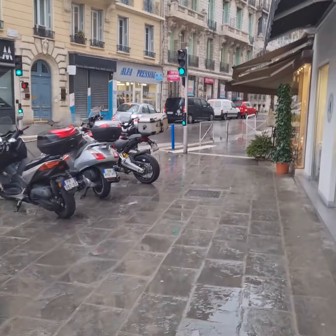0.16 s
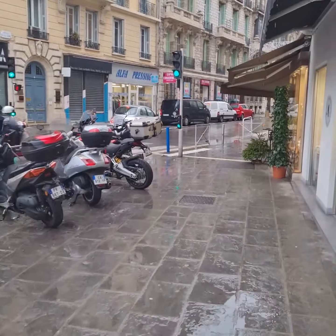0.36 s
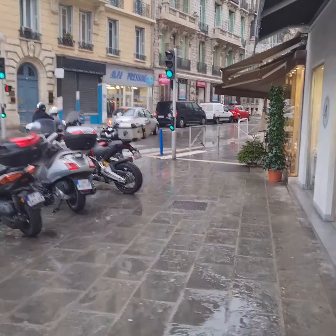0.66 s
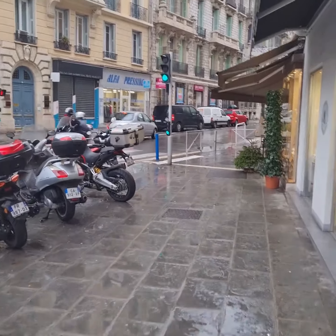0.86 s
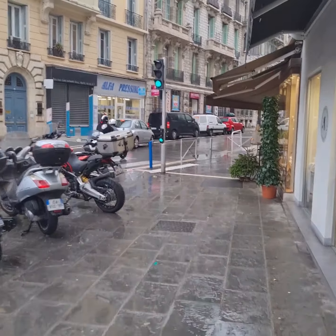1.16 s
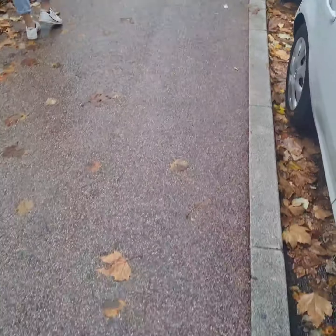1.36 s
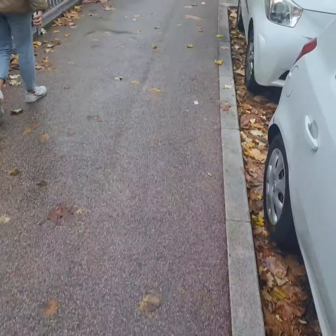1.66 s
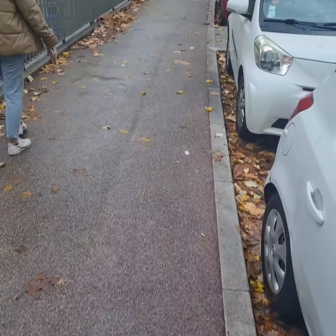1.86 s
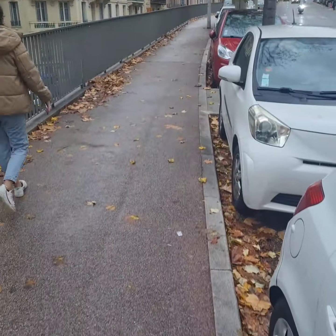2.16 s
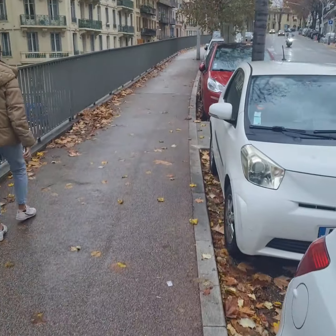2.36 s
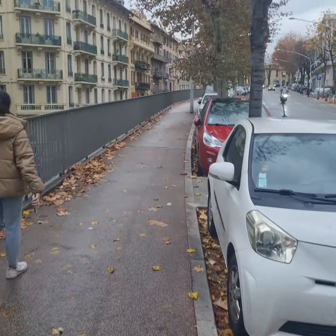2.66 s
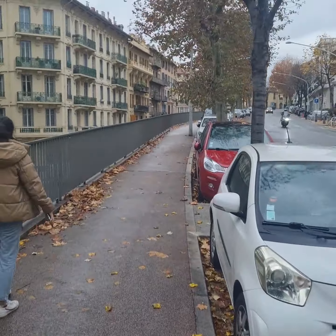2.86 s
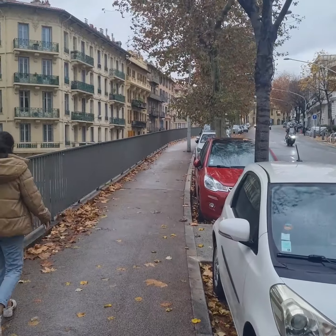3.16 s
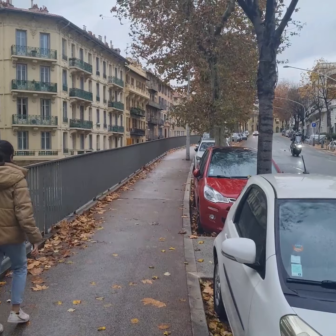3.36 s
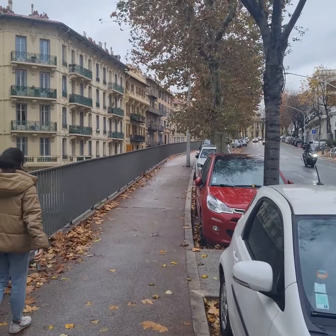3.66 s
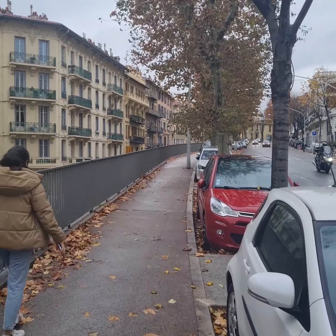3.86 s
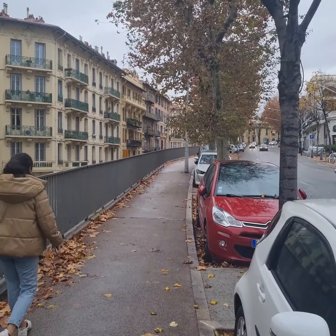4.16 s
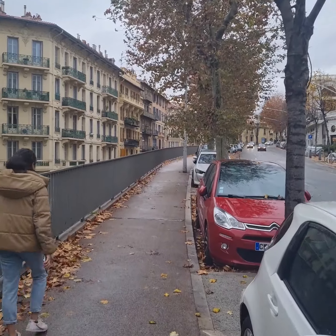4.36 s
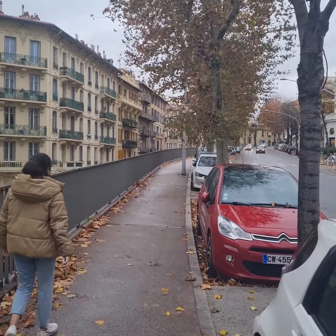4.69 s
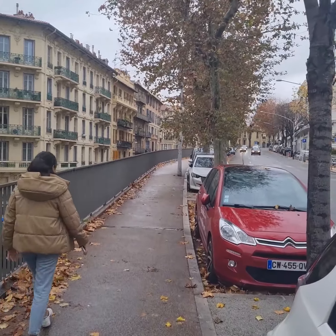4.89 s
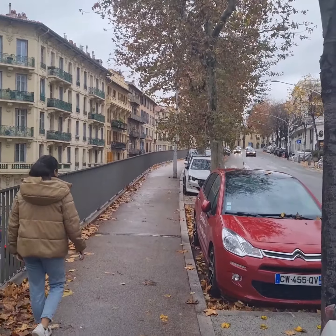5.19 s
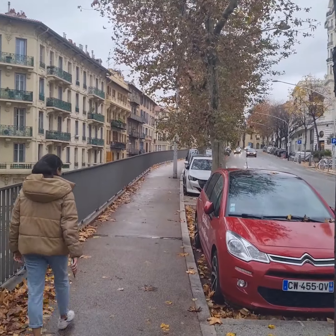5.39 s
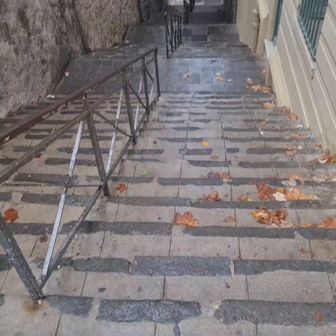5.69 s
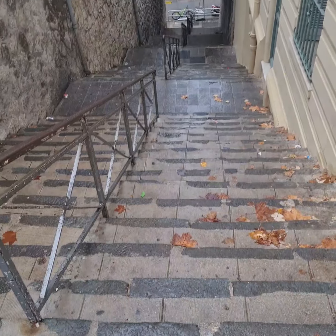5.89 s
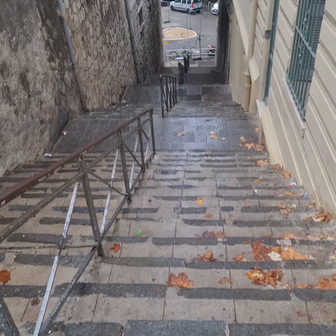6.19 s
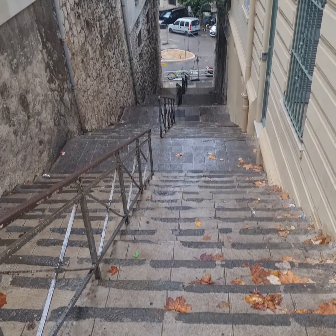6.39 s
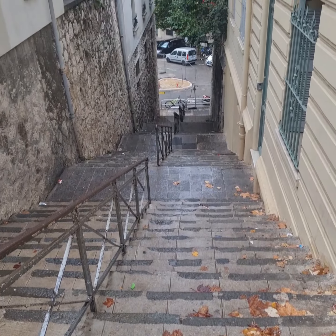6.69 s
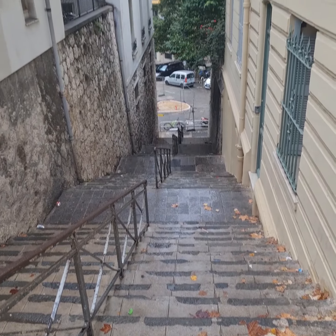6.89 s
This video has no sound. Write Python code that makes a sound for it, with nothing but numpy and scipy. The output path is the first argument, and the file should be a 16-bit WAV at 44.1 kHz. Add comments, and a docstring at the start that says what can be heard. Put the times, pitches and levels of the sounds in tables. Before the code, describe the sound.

Wet city traffic rumbles and hisses, with fine water spatter throughout, in three outdoor stretches that start and stop abruptly. Until 1.4 seconds a motorbike drones and rattles past, easing off, with a faint, very thin brake squeal around 1 second. After a brief silence, a quieter street begins at 1.5 seconds. Shoes tick and scuff irregularly on wet grit until about 3.4 seconds, and once more near 4.8. From 2.8 to 4.2 seconds a high brake squeal climbs slightly, is strongest around 3.6, then sinks away. Engines hum as a car draws near, its tyre hiss and low boom growing until a sudden stop at 5.7 seconds. After another tiny gap, duller traffic drones between walls, with one engine swelling around 6.5 seconds and continuing to the end at about 7.

```python
"""A walk through a wet town

Three short scenes with brief silences between them. At a junction a motorbike's exhaust drones and
rattles over the traffic. Along an avenue shoes tick on grit, a wet brake disc squeals and a car draws
near on hissing tyres. From a stairway between walls the traffic drones. Water spatters throughout."""
import sys
import numpy as np
from scipy import signal
from scipy.fft import rfft, irfft, next_fast_len
from scipy.io import wavfile
from scipy.ndimage import uniform_filter1d, map_coordinates

SR = 44100
rng = np.random.default_rng(int(sys.argv[2]) if len(sys.argv) > 2 else 0)


def to_wav(sig):
    """Store sig (one row per channel, or 1-D mono) as 16-bit WAV at the path in sys.argv[1].

    Samples outside -1..1 are clipped; the rate is SR.
    """
    pcm = np.clip(np.atleast_2d(sig), -1, 1) * 32767
    pcm = np.round(pcm).astype(np.int16)
    wavfile.write(sys.argv[1], SR, pcm.T)  # frames by channels


N = 310464

# when each place is heard: (start [s], end [s])
JUNCTION_SPAN, AVENUE_SPAN, STAIRS_SPAN = (-.01, 1.401), (1.4955, 5.7105), (5.784, 7.1)
TOP_HZ = 15870


def amp(db):
    """Decibels to gain."""
    return 10 ** (np.asarray(db) / 20)


def unit(x):
    """Scale to rms 1."""
    return x / np.sqrt(np.mean(x ** 2) + 1e-20)


def along(points, hz):
    """Read (frequency, value) points on a log frequency axis."""
    knots_hz, values = np.transpose(points)
    return np.interp(np.log(hz + 1), np.log(knots_hz + 1), values)


def curves(rows):
    """One automation curve for each column after the time."""
    times, *columns = np.transpose(rows)
    return [np.interp(np.arange(N) / SR, times, column) for column in columns]


def during(start, end):
    """A gate open between two times; it shuts abruptly, with a faint short tail."""
    t = np.arange(N) / SR
    gate = np.clip(np.minimum(t - start, end - t) / .002, 0, 1)
    tail = .12 * np.clip(1 - np.abs(t - end) / .023, 0, 1)
    return np.maximum(gate, tail)


def wobble(rate):
    """A smooth random curve, rate knots a second."""
    knots = rng.standard_normal(int(N * rate / SR) + 4)
    return map_coordinates(knots, [np.arange(N) * rate / SR], mode="nearest")


def filtered(x, response):
    """Shape x with a frequency response."""
    size = next_fast_len(N + SR // 4)
    return irfft(rfft(x, size) * response(np.fft.rfftfreq(size, 1 / SR)), size)[..., :N]


def passing(nearest_s, passing_s):
    """Least distance over present distance of something that goes by in a straight line."""
    return 1 / np.hypot(1, (np.arange(N) / SR - nearest_s) / passing_s)


def swell(peak_s, half_s, db):
    """A gain that peaks at db and is halved half_s to either side."""
    return amp(db) * passing(peak_s, half_s) ** 2


def flow(bed, cars, swells, scuffs=()):
    """Gains of rumble, roar, hiss and spray: the distant bed, swells, scuffs and cars going by."""
    falloff = np.array([1, 1.5, 1.56])[:, None]  # roar, hiss and spray fall as distance to these powers
    power = np.outer(amp(bed) ** 2, np.ones(N))
    power[0] += sum(swell(*row) ** 2 for row in swells)
    power[-1] += sum(swell(*row) ** 2 for row in scuffs)
    for nearest_s, passing_s, *levels in cars:
        power[1:] += (amp(levels)[:, None] * passing(nearest_s, passing_s) ** falloff) ** 2
    return np.sqrt(power)


def patchy_noise(patchy_db):
    """Two unrelated noises, mottled by patches of gain in time and frequency."""
    spectra = signal.stft(rng.standard_normal((2, N)), nperseg=512)[2]
    patches = uniform_filter1d(rng.standard_normal(spectra.shape[1:]), size=5, axis=0)
    patches = uniform_filter1d(patches, size=12, axis=1)
    return signal.istft(spectra * amp(patchy_db * unit(patches)), nperseg=512)[1][:, :N]


def droplets(rate, spread_db):
    """Water spatters in tiny impacts of very uneven size."""
    hits = (rng.random((2, N)) < rate / SR) * rng.standard_normal((2, N))
    sizes = amp(spread_db * np.minimum(rng.exponential(size=(2, N)), 4))
    return unit(hits * sizes)


def traffic(gains, colour, coherence, waver_db, patchy_db, drops_db):
    """Rumble, tread roar, wet hiss and spray of many cars; droplets pepper the two upper bands."""
    size = next_fast_len(N + SR // 4)
    hz = np.fft.rfftfreq(size, 1 / SR)
    width = np.arccos(np.clip(along(coherence, hz), -1, 1)) / 2
    low_cut = hz ** 2 / (hz ** 2 + 20 ** 2)
    shape = amp(along(colour, hz)) * np.array([np.cos(width), np.sin(width)]) * low_cut
    below = [1 / (1 + (hz / edge_hz) ** 10) for edge_hz in (1, 180, 2800, 8000, 30000)]
    out = np.zeros((2, N))
    for k, (gain, depth_db) in enumerate(zip(gains, waver_db)):
        source = patchy_noise(patchy_db)
        if k >= 2:
            source += amp(drops_db) * droplets(rate=450, spread_db=5.0)
        band = np.sqrt(np.abs(below[k + 1] - below[k]))
        mid, side = rfft(source, size) * shape * band
        pair = irfft(np.array([mid + side, mid - side]), size)[:, :N]
        out += pair / np.std(pair.mean(axis=0)) * gain * amp(depth_db * wobble(9))
    return out


def motorbike(fade_db, rough, clatter_db, wet):
    """A bike rolls past, easing off: exhaust orders on one unsteady shaft, and a pulsing rattle."""
    # the two strongest exhaust orders: (time [s], second order [dB], fourth order [dB])
    main_orders = [(0.0, -21, -41), (0.1, -26.5, -30), (0.716, -34, -25), (0.788, -28.5, -33.5),
                   (0.948, -38, -32), (1.01, -43, -41), (1.086, -27, -32), (1.184, -37, -33),
                   (1.39, -46, -38.5)]
    # single orders ring out: (order, time [s], half length [s], level [dB])
    order_swells = [(6, 0.64, 0.063, -35.5), (8, .84, 0.16, -36.5), (5, 1.22, .08, -35)]
    # exhaust overtones: (order, relative level [dB])
    exhaust = [(3, 0.5), (5, -6), (6, -3.5), (7, 0.5), (8, -6), (9, -3.5), (10, -8), (11, -9.5), (12, -8),
               (13, -9.5), (14, -5.5), (15, -25), (16, -10)]
    t = np.arange(N) / SR
    second_db, fourth_db = curves(main_orders)
    near = amp(-39.5) * passing(nearest_s=0.21, passing_s=0.9)
    shaft_hz = (67.28 - 0.806 * t) * (1 + .005 * wobble(25))
    phase = 2 * np.pi * np.cumsum(shaft_hz) / SR
    tone = lambda order: np.sqrt(2) * np.sin(order * phase + rng.uniform(0, 2 * np.pi))
    boom_db = -43.5 + 9.5 * np.minimum(t, JUNCTION_SPAN[1])  # the lowest boom grows behind the bike
    boom = amp(boom_db) * tone(1) + amp(second_db) * tone(2)
    drone = amp(fourth_db) * tone(4) + sum(swell(*row) * tone(k) for k, *row in order_swells)
    # wall reflections make each overtone swell and fade on its own
    overtones = near * sum(amp(db + fade_db * wobble(7.3)) * tone(k) for k, db in exhaust)
    firing = 1 + rough * wobble(60)  # no two firings are equally strong
    rattle = filtered(rng.standard_normal((2, N)), lambda hz: 1 / (1 + ((hz - 2100) / 700) ** 2))
    rattle = unit(rattle * (1 + np.cos(phase))) * near * amp(clatter_db)
    return boom + firing * drone + street_echo(firing * overtones, wet) + rattle


def street_echo(x, wet):
    """House fronts scatter a sound differently to each ear."""
    # decay between the house fronts: (frequency [Hz], t60 [s])
    facades = [(100, 0.99), (2000, 0.38), (6000, 0.6), (14000, .25)]
    hz, t, spectra = signal.stft(rng.standard_normal((2, SR * 3 // 4)), SR, nperseg=256)
    decay = amp(-60 * t / along(facades, hz)[:, None])
    tail = signal.istft(spectra * decay, SR, nperseg=256)[1]
    echo = signal.fftconvolve(x[None], tail, axes=1)[:, :N]
    return np.sqrt(1 - wet) * x + np.sqrt(wet) * unit(echo) * np.std(x)


def brake(hz, gain, jitter, chatter_db, octave_db, wet):
    """A wet disc sings in one mode; the pad grips and slips, shaking its pitch and strength."""
    phase = 2 * np.pi * np.cumsum(hz * (1 + jitter * wobble(420) + 0.0041 * wobble(40))) / SR
    octave = amp(octave_db) * np.sin(2 * phase) * (2 * hz < TOP_HZ)
    chatter = amp(chatter_db * np.tanh(wobble(110)))
    squeal = unit((np.sin(phase) + octave) * chatter)
    return street_echo(squeal * gain, wet)


def junction():
    """A motorbike and one thin brake squeal over the traffic."""
    # distant traffic: (rumble [dB], roar [dB], hiss [dB], spray [dB])
    bed = (-38.5, -35.5, -45, -53)
    # pass-bys: (nearest at [s], passing time [s], roar [dB], hiss [dB], spray [dB])
    cars = [(0, 0.18, -34.5, -42.5, -54), (.33, 0.17, -34.5, -43.5, -48), (1.37, 0.056, -44, -42, -53)]
    # rumble swells: (time [s], half length [s], level [dB])
    swells = [(1.1, .35, -41)]
    # traffic EQ: (frequency [Hz], relative level [dB])
    colour = [(24, -6), (45, 2.5), (95, -5), (180, -6), (310, -3.5), (620, -11.5), (1500, -12),
              (2300, -10.5), (3300, -17.5), (4800, -19.5), (7400, -28.5), (9000, -38), (12400, -34.5),
              (15700, -38)]
    # stereo image: (frequency [Hz], left-right coherence)
    coherence = [(60, .78), (150, .88), (380, .62), (950, .55), (2400, .35), (6000, -.05), (15000, -.03)]
    # brake squeal: (time [s], pitch [Hz], level [dB])
    thin_squeal = [(.855, 12000, -55), (.89, 12500, -51), (.98, 12350, -60), (1.15, 12000, -58)]
    road = traffic(flow(bed, cars, swells), colour, coherence,
                   waver_db=[1.2, 0.53, 0.32, 1.2], patchy_db=1.8, drops_db=-11.0)
    hz, db = curves(thin_squeal)
    gain = amp(db) * during(thin_squeal[0][0], thin_squeal[-1][0])
    squeal = brake(hz, gain, jitter=.014, chatter_db=1.0, octave_db=-30, wet=.6)
    return road + squeal + motorbike(fade_db=2, rough=0.26, clatter_db=-2.5, wet=0.35)


def driving(speed, booms, steady_db):
    """Pitch and gain of an engine that drifts in speed and booms under load."""
    at_s, hz, sag_hz_per_s = speed
    power = amp(steady_db) ** 2 + sum(swell(*row) ** 2 for row in booms)
    return hz - sag_hz_per_s * (np.arange(N) / SR - at_s), np.sqrt(power)


def car_engine(hz, gain, waver_db, overtone_db, rough):
    """The firing note of a car, uneven in strength, with weak overtones."""
    phase = 2 * np.pi * np.cumsum(hz * (1 + 0.0078 * wobble(18))) / SR
    overtones = sum(np.sin(k * phase + wobble(8)) for k in (2, 3, 4))
    note = np.sin(phase) + amp(overtone_db) * overtones
    return np.sqrt(2) * note * gain * amp(waver_db * wobble(7)) * (1 + rough * wobble(30))


def shoe_ticks():
    """Shoes knock, scuff and snap on wet grit."""
    # noise bursts underfoot: (time [s], band centre [Hz], level [dB], t60 [s])
    ticks = [(1.687, 10400, -44, .04), (1.805, 347, -32, 0.23), (1.88, 12500, -52, 0.56),
             (2.215, 4900, -40.5, 0.067), (3.03, 4005, -42, 0.27), (3.15, 3900, -44, .2),
             (3.385, 4610, -42, .2), (4.81, 12000, -45, 0.069)]
    out = np.zeros((2, N))
    for start_s, hz, db, t60 in ticks:
        age = np.arange(N) / SR - start_s
        snap = filtered(rng.standard_normal((2, N)), lambda f: 1 / (1 + ((f - hz) / (0.13 * hz)) ** 2))
        out += unit(snap) * (age >= 0) * amp(db - 60 * np.abs(age) / t60)
    return out


def braking():
    """One press of the pedal: the squeal climbs, jumps up while the pad grips hardest, and sinks."""
    # force on the pad: (time [s], pressure [0-1])
    pedal = [(2.81, .1), (2.93, .4), (3.13, .45), (3.36, .92), (3.7, 1), (4.04, .8), (4.13, .05), (4.22, 0)]
    grip_start_s, grip_end_s = 3.39, 3.77
    pressure, = curves(pedal)
    hz = 5990 + 410 * pressure + 140 * during(grip_start_s, grip_end_s)
    gain = amp(-55.5 + 12.5 * pressure) * during(pedal[0][0], pedal[-1][0])
    high = brake(hz, gain, jitter=.0125, chatter_db=4.0, octave_db=-20, wet=0.74)
    # a lower disc mode sings only in the hardest grip
    progress = np.clip((np.arange(N) / SR - grip_start_s) / (grip_end_s - grip_start_s), 0, 1)
    low_gain = amp(-48.5) * np.sqrt(np.sin(np.pi * progress))
    low = brake(hz=4135, gain=low_gain, jitter=0.0111, chatter_db=6, octave_db=-23, wet=0.34)
    return high + low


def sizzle(centre_hz, half_width_hz):
    """A close tyre throws up standing water in a bright band of noise."""
    # the tyre's pass: (nearest at [s], passing time [s], level [dB])
    tyre_pass = (5.7, 0.58, -43)
    band = lambda hz: 1 / (1 + ((hz - centre_hz) / half_width_hz) ** 4)
    water = filtered(patchy_noise(patchy_db=2.5), band)
    return unit(water) * swell(*tyre_pass)


def avenue():
    """Shoes tick, a brake squeals across the road, then a car comes up through the wet."""
    # distant traffic: (rumble [dB], roar [dB], hiss [dB], spray [dB])
    bed = (-38, -46, -50.5, -63.5)
    # pass-bys: (nearest at [s], passing time [s], roar [dB], hiss [dB], spray [dB])
    cars = [(1.95, 0.45, -43, -56, -58.5), (3.3, 0.85, -39, -49.5, -58), (5.2, 1, -34.5, -44.5, -51.5),
            (5.66, 0.22, -32, -37.5, -44.5)]
    # rumble swells: (time [s], half length [s], level [dB])
    swells = [(1.75, 0.046, -47), (2.475, 0.18, -38), (3.21, 0.11, -32.5), (3.777, 0.14, -31.5),
              (4.6, 0.47, -34), (5.26, .08, -27)]
    # soft, airy scuffs on wet pavement: (time [s], half length [s], level [dB])
    scuffs = [(1.5, 0.017, -52), (1.795, .04, -55), (1.913, .07, -55), (2.122, 0.13, -57), (3.23, .07, -55),
              (4.7, .05, -61)]
    # traffic EQ: (frequency [Hz], relative level [dB])
    colour = [(24, -22), (46, 7.5), (125, -5), (190, -14), (260, -10.5), (480, -17), (1650, -18),
              (2050, -17.5), (2750, -23), (4700, -26.5), (7700, -37.5), (8800, -46), (12200, -42.5),
              (15700, -46.5)]
    # stereo image: (frequency [Hz], left-right coherence)
    coherence = [(60, .86), (150, .92), (380, .83), (950, .58), (2400, .24), (6000, 0), (15000, 0)]
    # the near engine slows: (time [s], firing rate then [Hz], sag [Hz/s])
    speed = (4.75, 99.4, 5.5)
    # it booms under load: (time [s], half length [s], level [dB])
    booms = [(3.3, 0.39, -37.5), (4.254, 0.14, -36), (4.7, 0.082, -33), (5.43, .2, -25)]
    # an engine further off revs and eases: (time [s], firing rate [Hz], level [dB])
    far_revs = [(3.6, 133.3, -66), (3.95, 138.4, -35.5), (4.45, 144.6, -54), (4.8, 147.8, -43),
                (5.23, 140.8, -37.5), (5.7, 134.2, -47)]
    road = traffic(flow(bed, cars, swells, scuffs), colour, coherence,
                   waver_db=[1, 0.28, 0.69, 0.68], patchy_db=0.67, drops_db=-10.5)
    near = car_engine(*driving(speed, booms, steady_db=-44.5), waver_db=1.5, overtone_db=-19, rough=0.3)
    hz, db = curves(far_revs)
    far = car_engine(hz, amp(db), waver_db=-1.0, overtone_db=-25, rough=0.56)
    return road + near + far + sizzle(centre_hz=5640, half_width_hz=1300) + braking() + shoe_ticks()


def stairs():
    """Traffic and one engine drone up between the walls."""
    # distant traffic: (rumble [dB], roar [dB], hiss [dB], spray [dB])
    bed = (-34.5, -34, -43, -54.5)
    # pass-bys: (nearest at [s], passing time [s], roar [dB], hiss [dB], spray [dB])
    cars = [(6.0, 0.31, -48, -50, -50.5), (6.65, 0.32, -38, -55, -53.5)]
    # rumble swells: (time [s], half length [s], level [dB])
    swells = [(6.45, 0.34, -28.5)]
    # traffic EQ: (frequency [Hz], relative level [dB])
    colour = [(24, -20), (56, 6), (125, -8.5), (175, -15.5), (228, -6), (490, -19), (860, -15.5),
              (1250, -19.5), (1900, -21), (2900, -29.5), (4500, -32), (7300, -39), (8700, -47.5),
              (15700, -45)]
    # stereo image: (frequency [Hz], left-right coherence)
    coherence = [(60, .68), (150, .85), (380, .8), (950, .36), (2400, .07), (6000, -.04), (15000, -.03)]
    # the engine creeps up in speed: (time [s], firing rate then [Hz], sag [Hz/s])
    speed = (6.4, 99, -1.42)
    # it booms under load: (time [s], half length [s], level [dB])
    booms = [(6.46, 0.17, -25.5)]
    road = traffic(flow(bed, cars, swells), colour, coherence,
                   waver_db=[1, .35, .55, .9], patchy_db=0.7, drops_db=-11)
    car = car_engine(*driving(speed, booms, steady_db=-36), waver_db=0.5, overtone_db=-24, rough=0.19)
    return from_right(road + car, lag_samples=3.5)


def from_right(x, lag_samples):
    """Sound from the right reaches the left microphone later."""
    return filtered(x, lambda hz: np.exp(1j * np.pi * hz / SR * lag_samples * np.array([[-1], [1]])))


def scene():
    """The three places, one after another."""
    return (junction() * during(*JUNCTION_SPAN)
            + avenue() * during(*AVENUE_SPAN)
            + stairs() * during(*STAIRS_SPAN))


def record(dry):
    """Each microphone port adds its own colour; a steep high cut takes off the very top."""
    # tone difference between the ports: (frequency [Hz], left minus right [dB])
    balance = [(40, -4), (90, -1.7), (200, -1.4), (420, -2.3), (570, .2), (760, -1.6), (1300, -2.2),
               (2100, -5.3), (3900, -.8), (6000, -1.8), (9300, 5.5), (11600, 1), (14500, -2.5)]
    # phase difference between the ports: (frequency [Hz], left lead [rad])
    lead = [(45, .5), (110, .14), (250, .03), (1400, -.1), (2300, 1.1), (4000, .3)]
    half = np.array([[.5], [-.5]])
    ports = filtered(dry, lambda hz: amp(half * along(balance, hz)) * np.exp(1j * half * along(lead, hz)))
    return filtered(ports, lambda hz: np.clip((TOP_HZ - hz) / 100 + .5, 0, 1))


dry = scene()
out = record(dry)
to_wav(out)
```